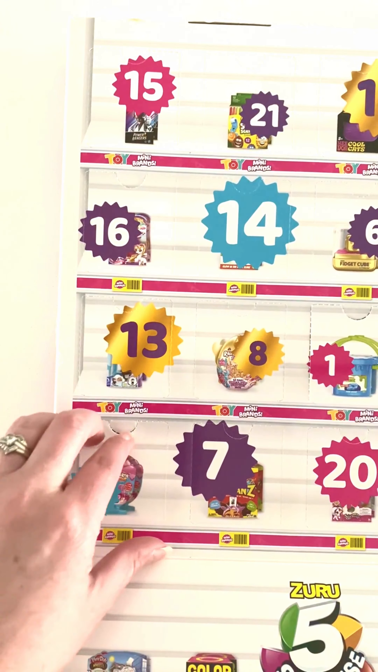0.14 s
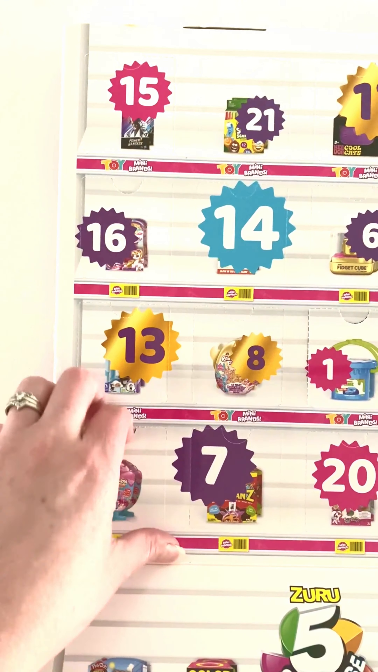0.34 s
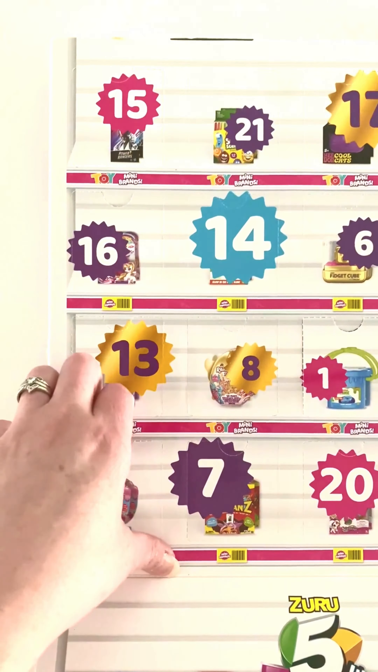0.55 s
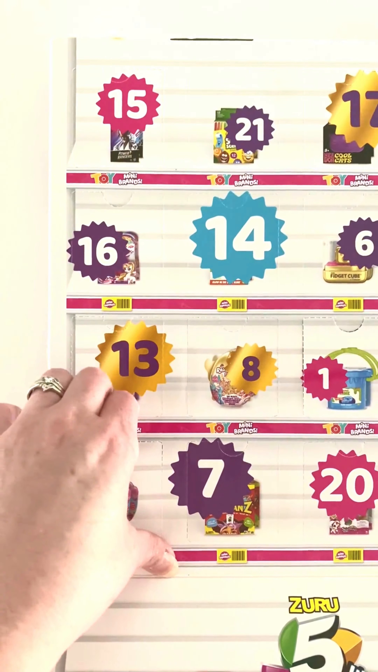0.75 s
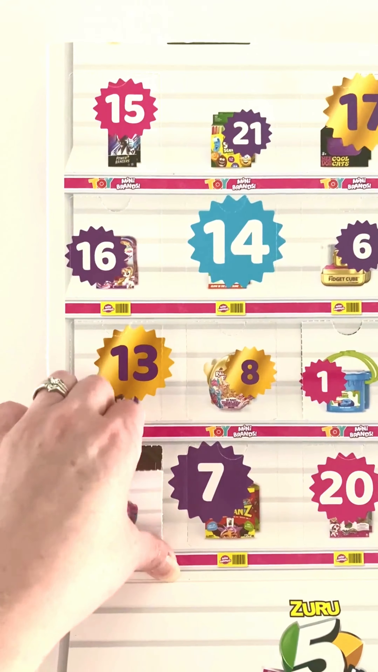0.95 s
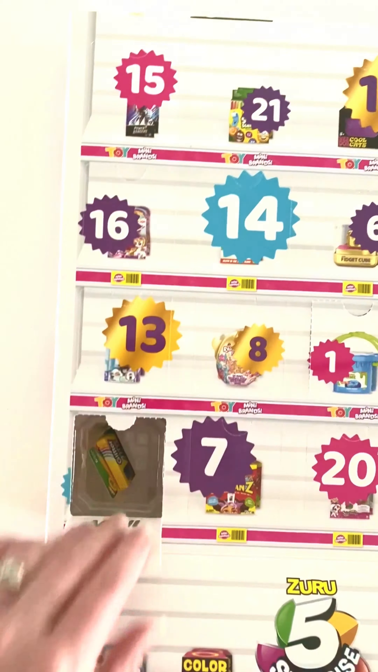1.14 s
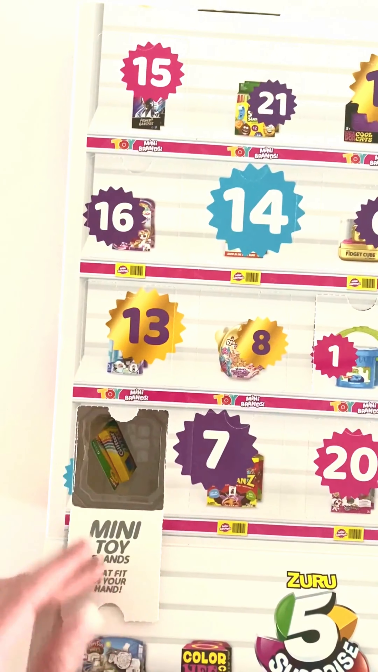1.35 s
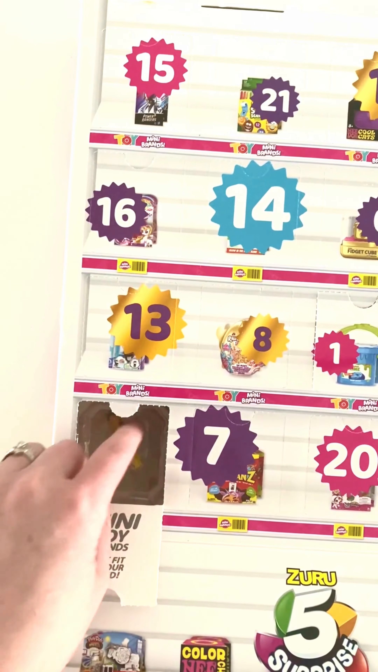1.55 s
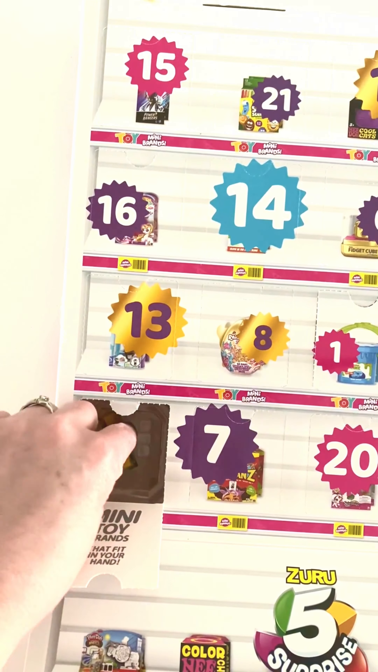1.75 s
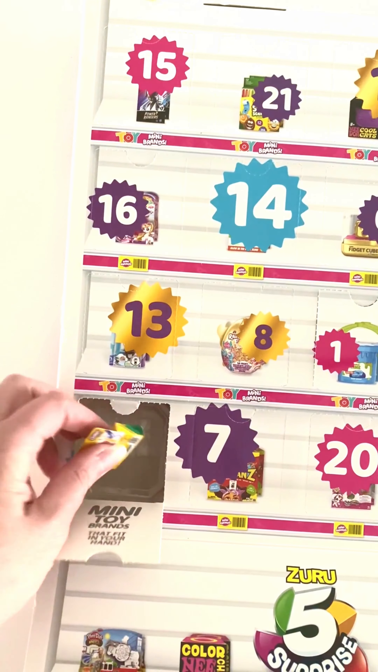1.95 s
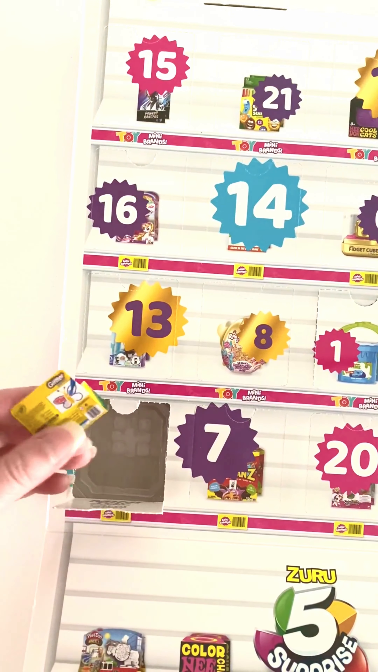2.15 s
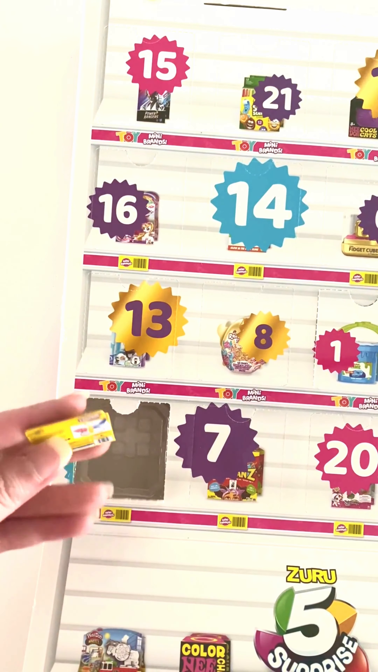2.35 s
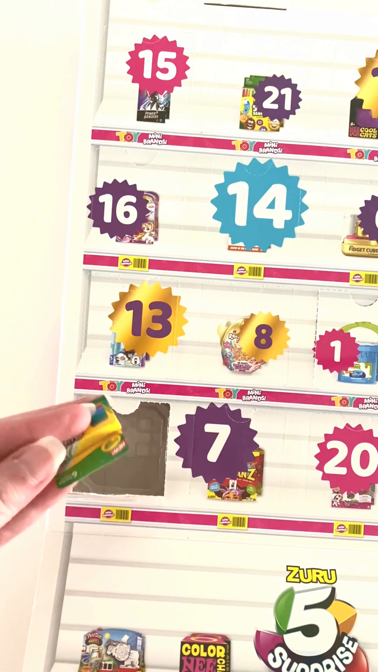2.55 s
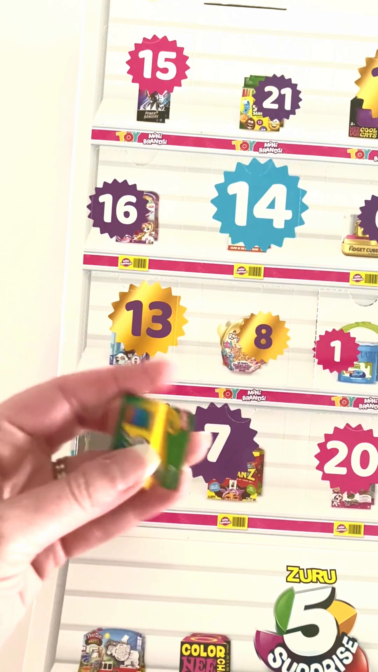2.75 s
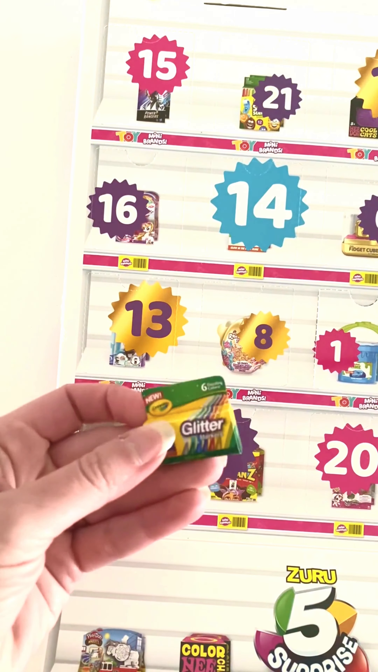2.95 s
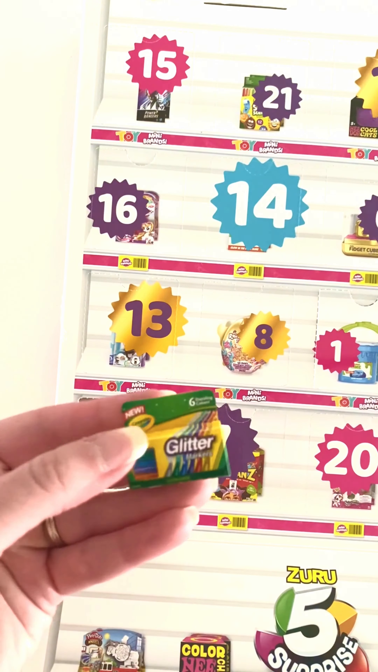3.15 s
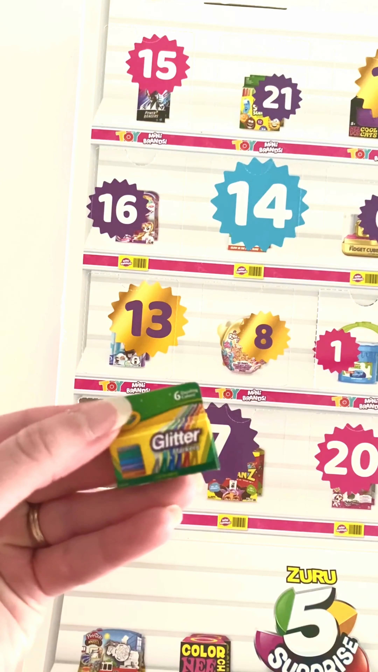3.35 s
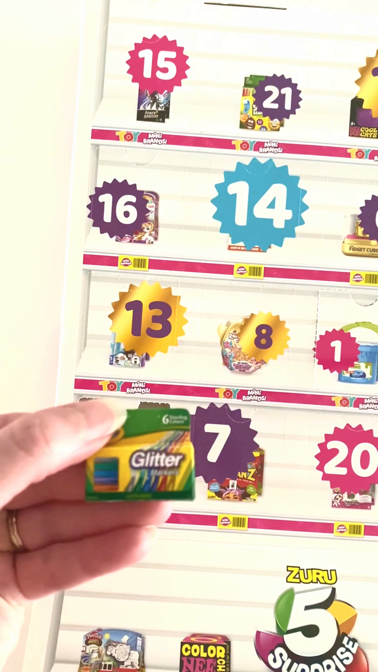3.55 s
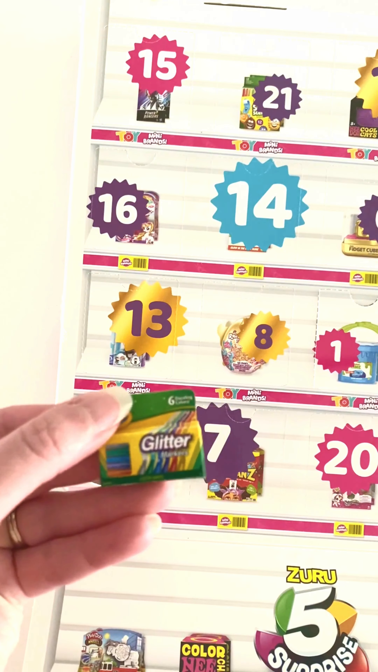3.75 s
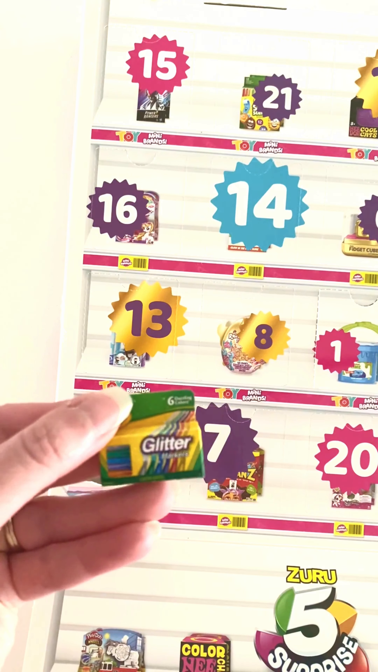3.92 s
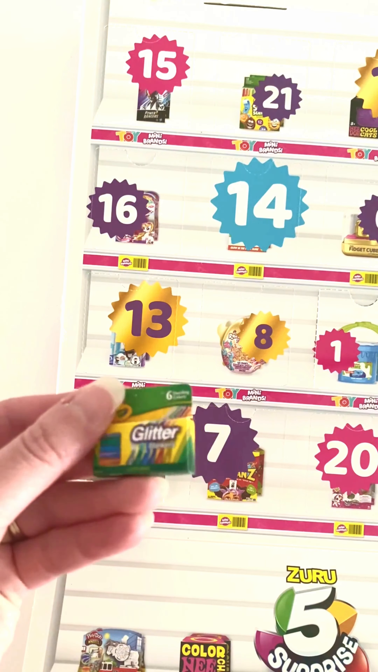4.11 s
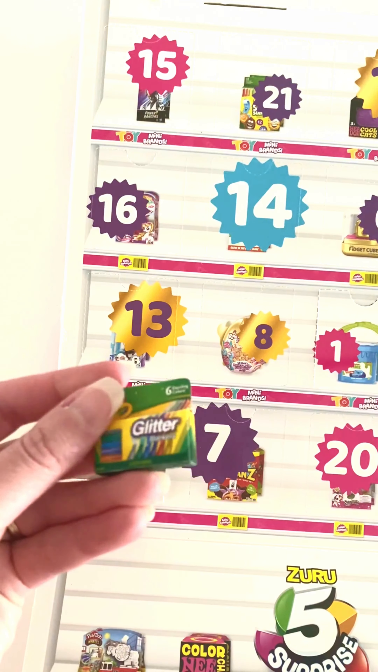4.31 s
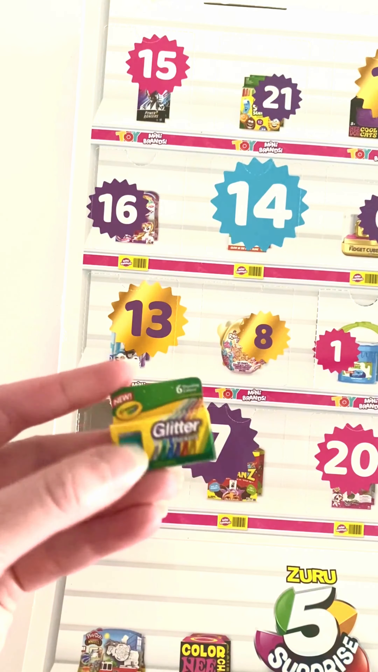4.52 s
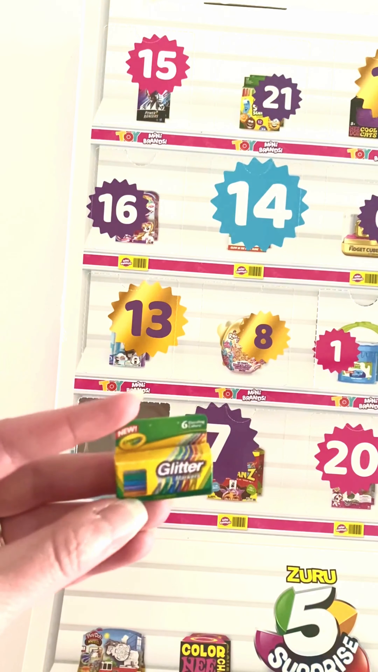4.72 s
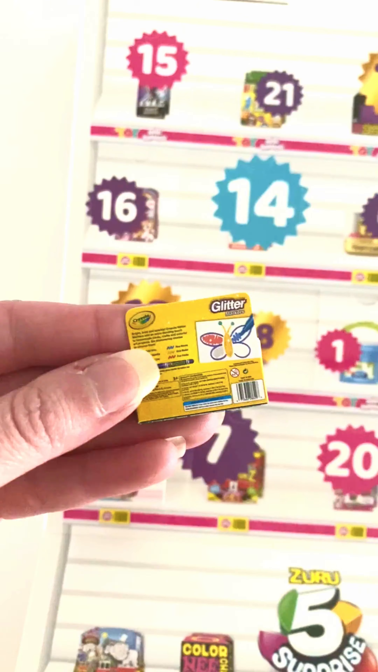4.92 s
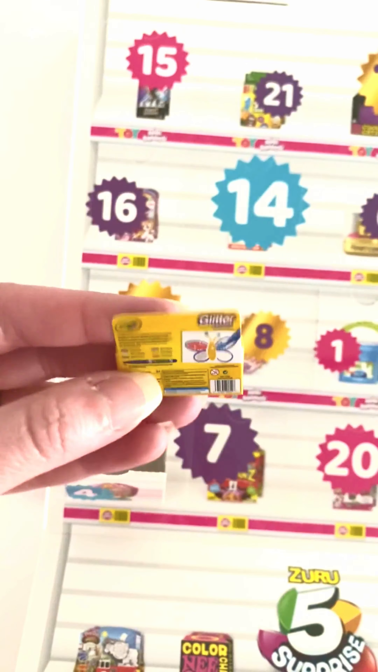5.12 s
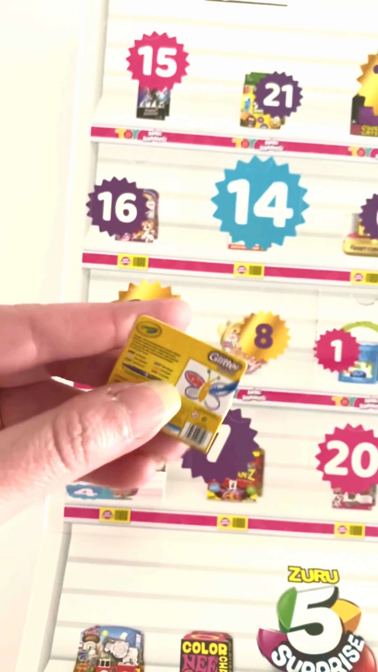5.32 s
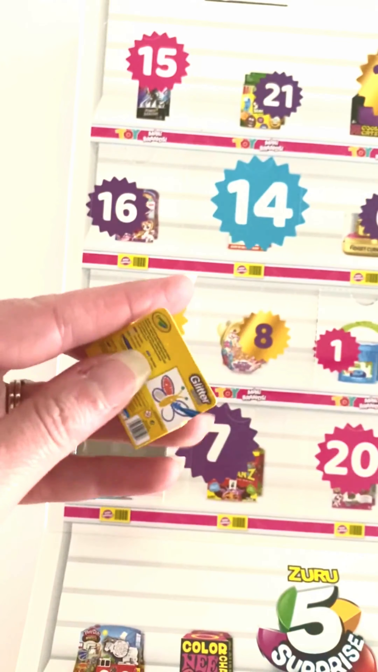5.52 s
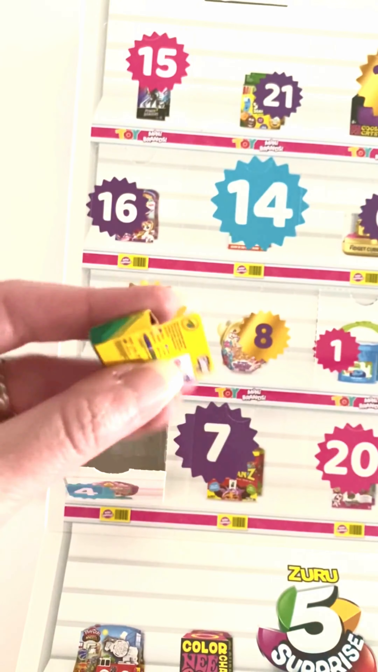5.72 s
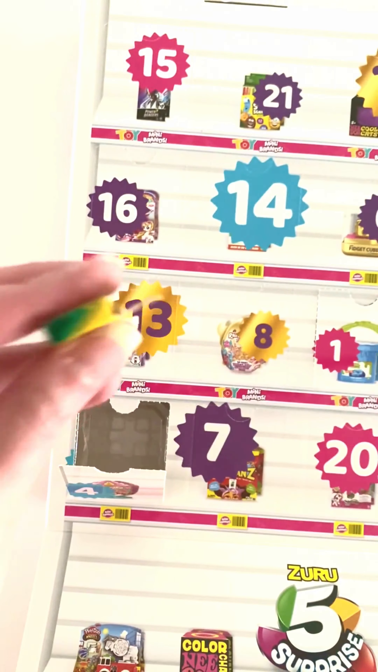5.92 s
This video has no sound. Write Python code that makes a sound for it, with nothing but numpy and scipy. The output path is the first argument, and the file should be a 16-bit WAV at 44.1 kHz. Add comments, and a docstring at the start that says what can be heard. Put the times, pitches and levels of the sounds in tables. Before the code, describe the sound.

A hand presses a perforated door in a hollow cardboard box, close to a phone microphone in a quiet furnished room. A tab snaps sharply at about 0.2 seconds, with a smaller crack near 0.55. At about 0.9 seconds the remaining tabs tear in a quick cluster of cracks, the loudest moment, with a brief hollow ring from the box. From 1 to 2 seconds, fingers scrape card and reach into a plastic tray, making softer knocks, low bumps and grainy rustles. Light rubs and dry ticks continue until 3 seconds as a small toy is turned over. Handling almost vanishes between 3 and 4 seconds, then faint skin friction and scattered thin ticks return until the end at about 6 seconds. A low appliance hum and a soft, steady rush of house noise lie underneath throughout.

```python
"""Tabs snap as a hand presses a perforated door in a hollow cardboard box: fibres crack, the panels
and cavity ring. The fingers reach into the plastic tray and turn a small toy over, with grainy
skin friction and dry ticks. Behind them an appliance hums over a low rush of house noise.
The room is quiet and furnished; a phone close by hears it through two microphone ports."""
import sys
import numpy as np
from scipy import signal
from scipy.fft import rfft, irfft, next_fast_len
from scipy.io import wavfile
from scipy.ndimage import uniform_filter1d, map_coordinates

SR = 44100
rng = np.random.default_rng(int(sys.argv[2]) if len(sys.argv) > 2 else 0)


def int16_out(signal):
    """Quantize to a 16-bit WAV file."""
    q = np.round(np.clip(np.atleast_2d(signal).T, -1, 1) * 32767)
    wavfile.write(sys.argv[1], SR, q.astype(np.int16))


N = 267731


def amp(db):
    """Decibels to gain."""
    return 10 ** (np.asarray(db) / 20)


def unit(x):
    """Scale to rms 1."""
    return x / np.sqrt(np.mean(x ** 2) + 1e-20)


def along(points, hz):
    """Read (Hz, value) points on a log axis."""
    f, v = np.transpose(points)
    return np.interp(np.log(hz + 1), np.log(f + 1), v)


def wobble(rate_hz):
    """Smooth random curve, rate_hz knots a second."""
    knots = rng.standard_normal(int(N * rate_hz / SR) + 4)
    return map_coordinates(knots, [np.arange(N) * rate_hz / SR])


def filtered(x, response):
    """Apply a complex frequency response."""
    size = next_fast_len(x.shape[-1] + 2048)
    return irfft(rfft(x, size) * response(np.fft.rfftfreq(size, 1 / SR)), size)[..., :x.shape[-1]]


def mode(f, hz, width_hz):
    """One causal resonance."""
    return 1j * f * width_hz / (hz * hz - f * f + 1j * f * width_hz)


def spread(pair, coherence):
    """Mix two unrelated signals to left and right of a given coherence."""
    angle = lambda f: np.arccos(np.clip(along(coherence, f), -1, 1)) / 2
    mid, side = filtered(pair, lambda f: np.array([np.cos(angle(f)), np.sin(angle(f))]))
    return np.array([mid + side, mid - side])


# appliance tones: f/Hz, rms level/dB, unsteadiness/0-1
HUM_TONES = [(104.7, -52, .2), (120.3, -46, .08), (52, -60, .5), (66.6, -57, .4), (136, -61, .4),
             (161, -64, .8), (208, -70, .8), (240.5, -68, .3)]
def hum():
    """Appliance tones waver in strength and phase, nearly alike on both sides."""
    t = np.arange(N) / SR
    tones = np.zeros(N)
    for hz, db, unsteady in HUM_TONES:
        waver = (1 + unsteady * (wobble(5.4) + 1j * wobble(9.2))) / np.sqrt(1 + 2 * unsteady ** 2)
        carrier = np.exp(2j * np.pi * (hz * t + rng.random()))
        tones += amp(db) * np.sqrt(2) * np.real(waver * carrier)
    left = np.roll(tones, 2)  # the left port is two samples further away
    return np.array([left, tones]) * amp([[.15], [-.15]])


# house noise spectrum: f/Hz, density/dB
AIR_SPECTRUM = [(12, -31.5), (25, -10.5), (55, -6), (80, -0.5), (105, -6), (150, -1.5), (220, -4),
                (290, -13), (400, -11), (560, -20.5), (780, -20), (1700, -37.5), (2800, -43.5), (6000, -53),
                (16000, -65.5)]
# faint fuzzy whines: f/Hz, width/Hz, level over the noise/dB
AIR_WHINES = [(802, 70, 4), (2780, 110, 6), (3817, 130, 9), (4786, 110, 8), (5760, 120, 10)]
# left-right likeness of the noise: f/Hz, coherence/0-1
AIR_COHERENCE = [(60, 1.0), (180, 1.0), (550, 0.28), (1650, 0.082), (4970, 0.01), (15000, 0.06)]
def air(level_db=-56.5):
    """Steady low rush of the house over the microphone's own hiss."""
    whines = lambda f: 1 + sum((amp(db) - 1) * mode(f, hz, width) for hz, width, db in AIR_WHINES)
    noise = filtered(rng.standard_normal((2, N)), lambda f: amp(along(AIR_SPECTRUM, f)) * whines(f))
    return amp(level_db + 1.5 * wobble(4.4)) * unit(spread(noise, AIR_COHERENCE))


def stick_slip():
    """Gain curve of skin slipping in small uneven catches."""
    return amp(0.47 * wobble(60) + 1.1 * wobble(120) + 1.6 * wobble(400) + 4.1 * wobble(2500))


def add_stroke(out, start_s, length_s, db, colour, catches, settle_s=.006):
    """One stroke of grainy noise swells and fades; the skin lets go slowly."""
    at = round(start_s * SR)
    t = np.arange(round((length_s + 0.052) * SR)) / SR
    rise = t / (0.0096 + 0.2 * length_s)
    fall = (length_s - t) / (0.0075 + .3 * length_s) + .5
    swell = np.sin(np.pi / 2 * np.clip(np.minimum(rise, fall), 0, 1)) ** 2
    swell = signal.lfilter([1], [1, -np.exp(-1 / (settle_s * SR))], swell) / (settle_s * SR)
    grain = np.resize(catches[at:], len(t)) * rng.standard_normal((2, len(t)))
    out[:, at:at + len(t)] += amp(db) * filtered(swell * grain, colour) / np.std(filtered(grain, colour))


# hollow box modes: f/Hz, width/Hz, level/dB
BOX_MODES = [(205, 50, -1.5), (261, 10, -6), (306, 70, -12.5), (453, 53, 0), (521.3, 54, 0), (610, 70, -5),
             (750, 50, 1.5), (896, 50, 0.5), (1076, 170, -8), (1370, 91, -6.5), (1820, 190, -5.5)]
def box_rumble(f):
    """Response of panels and cavity to soft skin, which drives the low modes most."""
    modes = sum((-1) ** k * amp(db) * mode(f, hz, width) for k, (hz, width, db) in enumerate(BOX_MODES))
    return modes / (1 + f / 220)


# finger slides: t/s, length/s, scrape level/dB, ring f/Hz, hiss re scrape/dB
SLIDES = [(0, 0.074, -77, 4200, -8), (0.087, 0.12, -78.5, 3000, 10), (0.448, 0.048, -58, 2010, -5),
          (0.6, .11, -80, 3000, 4.5), (0.872, 0.12, -61, 2010, -1.5), (1.038, 0.064, -59, 1270, 0),
          (1.102, 0.018, -51, 1970, -1), (1.123, 0.13, -64.5, 2850, 1.7), (1.209, 0.033, -56, 2650, -15),
          (1.284, 0.12, -75.5, 2510, 3), (1.371, 0.088, -50, 2740, -5), (1.456, 0.088, -55.5, 3440, -0.2),
          (1.545, 0.039, -52, 1530, -7), (1.607, 0.066, -58, 1950, -1.5), (1.669, 0.16, -61.5, 2080, -5),
          (1.804, 0.054, -55, 4150, -1), (1.878, 0.15, -69, 2570, 2), (2.046, 0.031, -52, 3300, -0.5),
          (2.109, 0.065, -64, 2090, -2), (2.18, 0.098, -77.5, 2500, -0.2), (2.244, 0.089, -63.5, 2500, -6),
          (2.325, 0.074, -74.5, 2810, -2), (2.403, 0.05, -65.5, 2700, 4), (2.458, 0.046, -72.5, 3040, 13),
          (2.593, 0.045, -55.5, 3250, 0), (2.645, 0.019, -79, 3050, -0.1),
          (2.752, 0.062, -56.5, 2930, -1.5), (2.808, 0.09, -70.5, 2020, 7), (2.881, 0.031, -54, 2930, -4),
          (2.921, 0.084, -76.5, 3300, 0.4), (3.044, 0.04, -74.5, 1890, -9), (3.415, 0.048, -78, 2690, -5),
          (3.66, .02, -76, 2990, -15), (3.937, .03, -74, 2790, -19.5), (4.097, 0.014, -65, 2780, 4.05),
          (4.352, 0.078, -77.5, 2740, -8), (4.471, 0.051, -69.5, 3810, -5), (4.529, 0.06, -64, 3490, -7),
          (4.813, 0.12, -67.5, 3320, -20.5), (5.069, 0.067, -72, 2210, -2.5),
          (5.143, 0.023, -70.5, 1500, -15), (5.254, 0.043, -63, 2000, -9.5),
          (5.368, 0.025, -71.5, 2300, 1.4), (5.495, 0.029, -77.5, 2010, -5.5),
          (5.561, 0.035, -61.5, 2470, -2), (5.64, 0.038, -62.5, 2747, 7), (5.681, 0.039, -64.5, 2400, -10),
          (5.79, 0.022, -81, 3990, 4), (5.889, 0.016, -75, 3000, 6.5), (5.983, 0.045, -76.5, 3806, 5.5)]
# scrape spectrum: f/Hz, density/dB
SCRAPE_SPECTRUM = [(600, -36.5), (1200, -3), (2000, -4.5), (2700, -7.5), (3800, -7.5), (5000, -17),
                   (8000, -25)]
# friction hiss, with the phone microphone's lift near 15 kHz: f/Hz, density/dB
HISS_SPECTRUM = [(3000, -24.5), (5000, 1.5), (7000, 0.5), (9000, -1), (11500, -2.5), (13200, -8),
                 (14300, 3), (15800, 1.5)]
def rubs(lift_s=2.04, grip_db=2.2):
    """Fingers slide on card and plastic and ring the hollow, less once the hand lifts off the box."""
    out = np.zeros((2, N + SR))
    scrape_catches, hiss_catches, rumble_catches = [stick_slip() for _ in range(3)]
    clumps = amp(2.2 * wobble(90) + 1.5 * wobble(250))  # the finest fibres crackle in clumps
    for start_s, length_s, db, ring_hz, hiss_db in SLIDES:
        knots = rng.standard_normal(40)  # each grip damps the many small modes differently
        grip = lambda f: amp(grip_db * np.interp(f, np.linspace(0, SR / 2, len(knots)), knots))
        hiss_hz = 7100 * rng.normal(1, .15)
        scrape_ring = lambda f: 1 + 3 * mode(f, ring_hz, .24 * ring_hz)
        hiss_ring = lambda f: 1 + 0.84 * mode(f, hiss_hz, 0.12 * hiss_hz)
        scrape = lambda f: amp(along(SCRAPE_SPECTRUM, f)) * scrape_ring(f) * grip(f)
        hiss = lambda f: amp(along(HISS_SPECTRUM, f)) * hiss_ring(f) * grip(f)
        rumble_db = 6.5 if start_s < lift_s else -8
        add_stroke(out, start_s, length_s, db, scrape, clumps * scrape_catches)
        add_stroke(out, start_s, length_s, db + hiss_db, hiss, clumps * hiss_catches)
        add_stroke(out, start_s, length_s, db + rumble_db, box_rumble, rumble_catches)
    return out[:, :N]


# finger presses: t/s, length/s, level/dB
PRESSES = [(0.064, 0.047, -58.5), (0.379, 0.082, -55), (0.968, 0.03, -43), (1.401, 0.11, -47.5),
           (1.552, 0.02, -39), (2.015, 0.028, -50.5), (2.268, 0.025, -55)]
def presses():
    """Fingers bend the box without sliding, and it rumbles."""
    out = np.zeros((2, N + SR))
    catches = stick_slip()
    for start_s, length_s, db in PRESSES:
        add_stroke(out, start_s, length_s, db, box_rumble, catches)
    return out[:, :N]


def box_knock(t, knock_hz, rise_s=0.00061):
    """The panels take up a blow just after the crack; modes near knock_hz are struck hardest."""
    ring = np.zeros(len(t))
    for hz, width_hz, db in BOX_MODES:
        strength = amp(db - 7.6 * np.log2(hz / knock_hz) ** 2 + 1.8 * rng.normal())
        gripped_hz = hz * rng.normal(1, .02)  # the grip shifts each mode
        phase = 2 * np.pi * gripped_hz * t + rng.normal(0, 0.7)
        ring += strength * np.exp(-np.pi * width_hz * t) * np.sin(phase)
    return ring * (1 - np.exp(-t / rise_s))


# treble click spectrum: f/Hz, gain/dB
CLICK_SPECTRUM = [(2500, -30), (5000, -1.5), (7000, 1), (10000, -5), (13000, -9.5), (16000, -7)]
# crack spectrum: f/Hz, gain/dB
CRACK_SPECTRUM = [(300, -21), (1000, -2.5), (2500, -3), (4500, -6.5), (7000, -17.5), (16000, -42.5)]
def fibre_breaks(events, rise_s=0.00055, spike_s=0.00089):
    """Fibres break in milliseconds: a bright click, a pitched crack and a knock that rings the box."""
    t = np.arange(SR // 8) / SR
    decay = lambda t60_s: amp(-60 * t / t60_s)
    attack = (1 - np.exp(-t / rise_s)) * (1 + .8 * np.exp(-t / spike_s))  # the first fibres part at once
    clicks, cracks, knocks = np.zeros((3, N + SR))
    for start_s, db, click_db, knock_db, crack_hz, knock_hz, t60_s in events:
        fibres = rng.standard_normal(len(t)) * attack * decay(t60_s)
        crack = fibres + 3 * filtered(fibres, lambda f: mode(f, crack_hz, 0.34 * crack_hz))
        knock = box_knock(t, knock_hz) * decay(6 * t60_s)  # the hand damps the panels
        at = round(start_s * SR)
        clicks[at:at + len(t)] += amp(db + click_db) * fibres * decay(0.24)
        cracks[at:at + len(t)] += amp(db) * crack
        knocks[at:at + len(t)] += amp(db + knock_db) * knock
    low_cut = lambda f: (1j * f / (120 + 1j * f)) ** 2  # a small box radiates little bass
    return (filtered(clicks[:N], lambda f: amp(along(CLICK_SPECTRUM, f)))
            + filtered(cracks[:N], lambda f: amp(along(CRACK_SPECTRUM, f)))
            + filtered(knocks[:N], low_cut))


# tab snaps and finger knocks: t/s, crack drive/dB, click re drive/dB, knock re drive/dB, knock f/Hz
TAB_SNAPS = [(0.0861, -58.5, -7, 24, 223), (0.2055, -11, -6.5, -6.5, 745), (0.214, -21.5, -8, 2, 202),
             (0.3993, -61.5, -28, 24, 269), (0.4296, -53, -34, 11.5, 530),
             (0.452, -31.5, -12.5, -6.5, 1150), (0.46, -41, -12, 7, 385),
             (0.5561, -18.5, -20.5, -16.5, 770), (0.6804, -44, -34, -13.5, 436),
             (0.859, -54.5, -1, 14, 202), (0.9298, -11.5, -5, 3, 797.3), (0.9334, -14, -1, 2, 769.6),
             (0.9425, -11.5, -30, -31, 490), (0.9483, -18, -11, 2, 447), (0.9534, -11, -21, -9, 430),
             (1.0624, -33, -16, -0.5, 905), (1.1103, -34, -1, -8.5, 191), (1.4257, -34, -18, -4.5, 524),
             (1.5646, -31, -34, -4, 993), (1.571, -52, -29, 1, 210), (1.5818, -43, -26, 8, 264),
             (1.6093, -42.5, -12, 8, 215), (1.6442, -38.5, -23, 2.5, 670), (1.6547, -46, -19, 10, 314),
             (1.8264, -25, -24, 0.5, 520), (1.8519, -39, -27, 5, 509)]
def snaps(flap_hz=1466, t60_s=.025):
    """Tabs snap and fingers knock; the size of the flap that lets go sets each crack's pitch."""
    return fibre_breaks([(start_s, db, click_db, knock_db, flap_hz * rng.normal(1, .06), knock_hz, t60_s)
                         for start_s, db, click_db, knock_db, knock_hz in TAB_SNAPS])


# the tear's first tab snap (0.93 s) and thin ticks: t/s, crack drive/dB, crack f/Hz, click re drive/dB
SHORT_CRACKS = [(0.241, -34.5, 3370, 2.5), (0.9279, -5, 2450, -12), (1.2392, -38, 2800, -30),
                (1.3613, -45.5, 3350, -19), (1.377, -48, 2780, -9), (2.0315, -43, 2533, -23.5),
                (2.4284, -38, 1935, -8.5), (2.6311, -39, 2764, -19), (2.648, -53, 2880, -0.5),
                (2.7767, -43.5, 2796, -11.5), (2.9017, -42, 2690, -9.5), (4.9507, -42.5, 2966, -9.5),
                (5.296, -40, 1680, -11), (5.3695, -51, 2404, 3), (5.4993, -56, 1996, -7),
                (5.67, -47, 2680, 2.5), (5.7214, -51.5, 1950, -4.5)]
def short_cracks(knock_db=-16, knock_hz=207, t60_s=0.014):
    """One loud snap starts the tabs tearing; the rest are nail or fibre ticks on card or plastic."""
    return fibre_breaks([(start_s, db, click_db, knock_db, crack_hz, knock_hz, t60_s)
                         for start_s, db, crack_hz, click_db in SHORT_CRACKS])


# room decay: f/Hz, t60/s
ROOM_T60 = [(200, 0.58), (1000, 0.22), (4000, 0.41), (12000, 0.14)]
def room(x, predelay_s=.005):
    """Walls scatter the sound into noise; the power in each band dies at its own rate."""
    hz, t, spectrum = signal.stft(x, SR, nperseg=256)
    power = uniform_filter1d(np.abs(spectrum) ** 2, size=3, axis=0)
    kept_per_frame = amp(-2 * 60 * t[1] / along(ROOM_T60, hz))
    for k in range(1, len(t)):
        power[:, k] = kept_per_frame * power[:, k - 1] + (1 - kept_per_frame) * power[:, k]
    noise = signal.stft(rng.standard_normal((2, N)), SR, nperseg=256)[2]
    diffuse = unit(np.abs(noise)) * np.exp(1j * np.angle(noise))
    wet = signal.istft(diffuse * np.sqrt(np.abs(power)), SR, nperseg=256)[1]
    return np.pad(wet, ((0, 0), (round(predelay_s * SR), 0)))[:, :N]


# phase of the box between the ports: f/Hz, left lead/rad
PORT_PHASE = [(200, .15), (1200, .2), (2800, .9), (3700, .6), (4600, 1.2), (6000, 1.1), (9000, .9),
              (16000, .4)]
# left-right likeness of the fingers: f/Hz, coherence/0-1
FINGER_COHERENCE = [(200, 1), (700, 0.98), (2400, .6), (4400, 0.39), (8000, 0.67), (15000, 1)]
def scene():
    """Hands and box close by, the room around; the box reaches each port by a slightly different path."""
    breaks = snaps() + short_cracks()
    fingers = rubs() + presses()
    ports = filtered(breaks, lambda f: np.exp(.5j * np.outer([1, -1], along(PORT_PHASE, f))))
    reverb = amp(-9.5) * room(breaks + amp(-1) * fingers[0])
    return ports + spread(fingers, FINGER_COHERENCE) + reverb + hum() + air()


def record(dry):
    """The phone keeps nothing above its band limit."""
    limit_hz = 15900
    return filtered(dry, lambda f: 1 / (1 + (f / limit_hz) ** 120))


dry = scene()
out = record(dry)
int16_out(out)
```